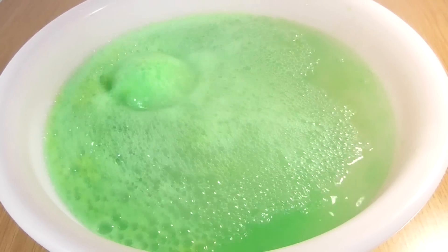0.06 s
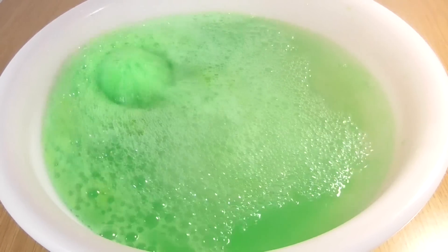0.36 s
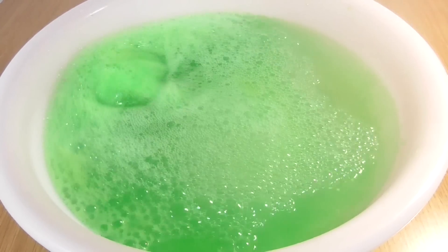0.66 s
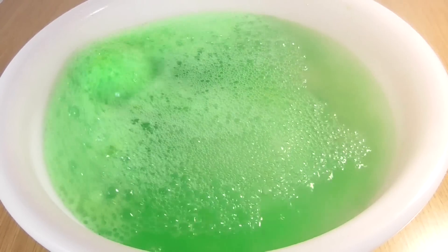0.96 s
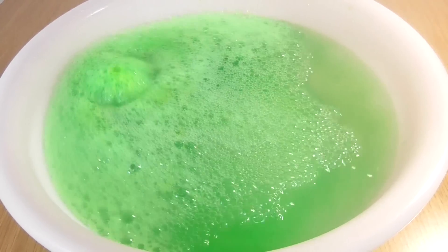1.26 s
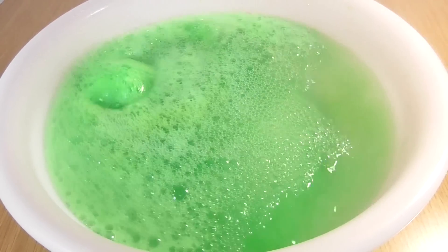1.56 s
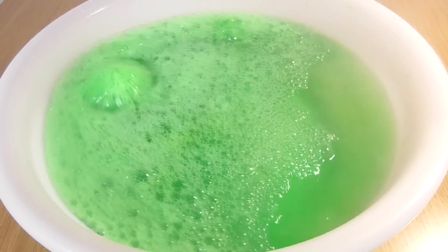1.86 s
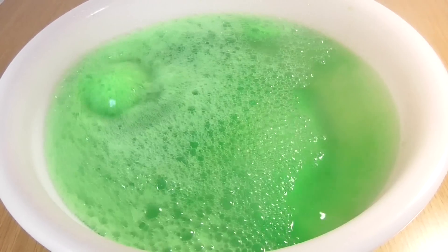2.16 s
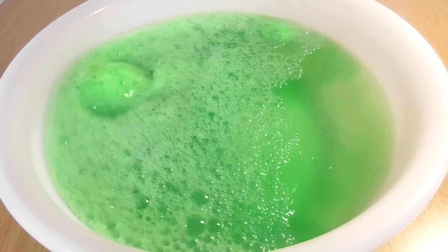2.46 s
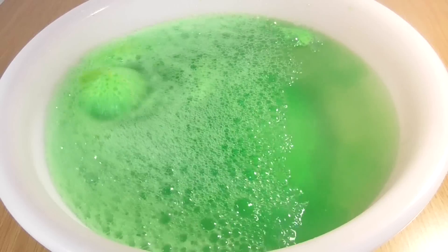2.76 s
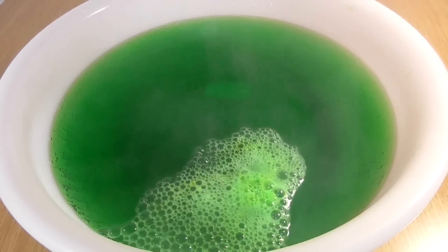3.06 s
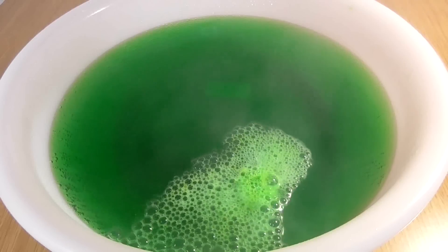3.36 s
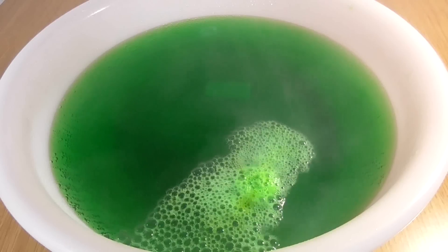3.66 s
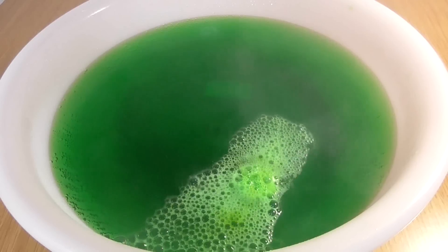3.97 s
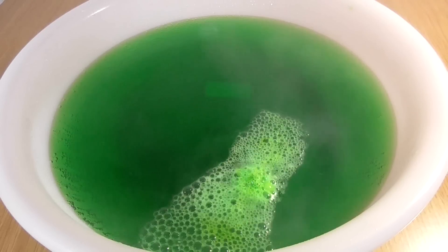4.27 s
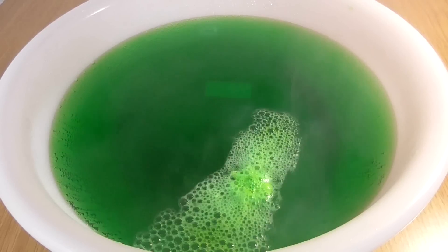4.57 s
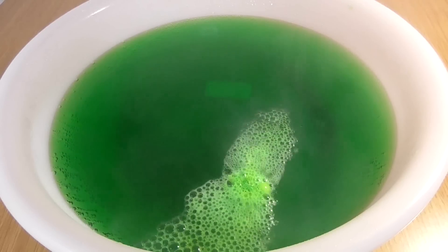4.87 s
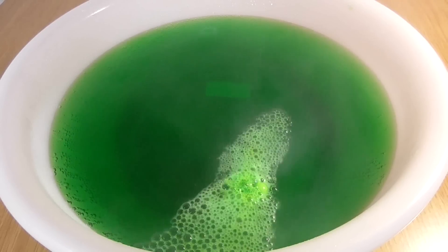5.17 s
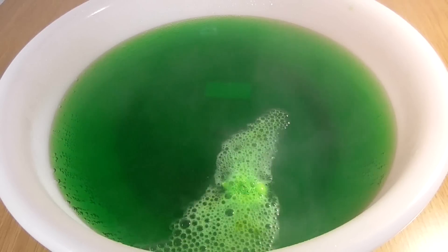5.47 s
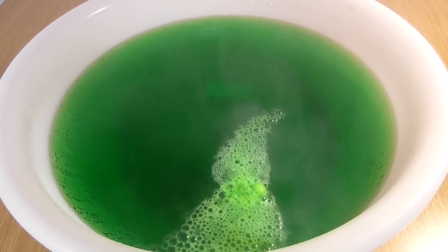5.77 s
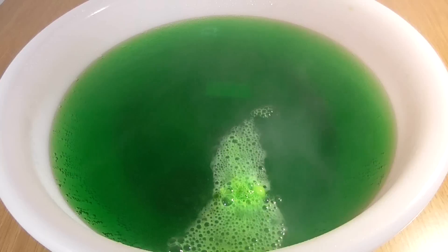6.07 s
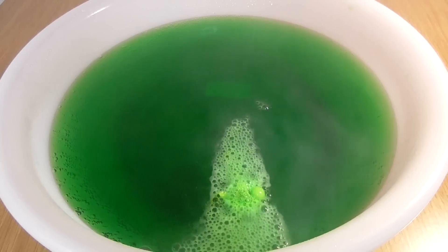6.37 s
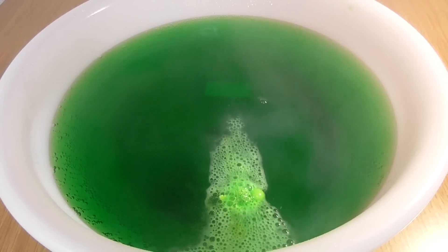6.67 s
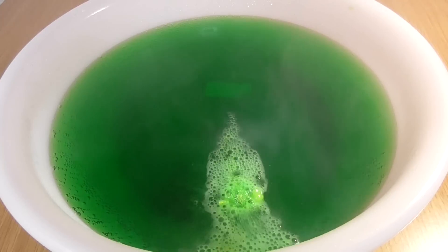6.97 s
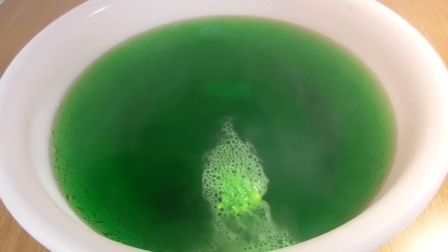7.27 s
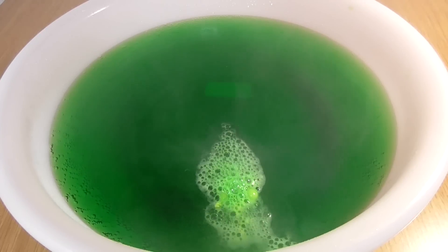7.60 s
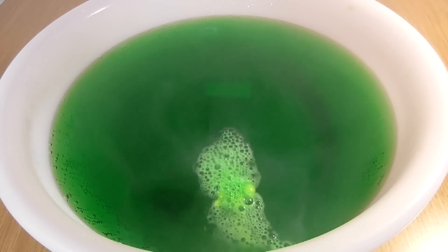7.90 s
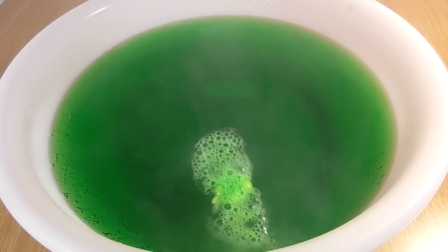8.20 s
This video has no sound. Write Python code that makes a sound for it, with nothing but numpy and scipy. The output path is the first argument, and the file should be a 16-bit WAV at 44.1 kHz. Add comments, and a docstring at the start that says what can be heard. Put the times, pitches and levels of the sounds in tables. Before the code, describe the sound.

Dense, crackling fizz of foam on water, with two soft knocks early on, suddenly giving way to a fine, high hiss of tiny bubbles.

```python
"""A full, bright fizz: a bath ball dissolves under a thick raft of foam in a bowl of water.
Thousands of tiny bubbles burst each second, each an impulse coloured by the resonances of the bowl.
The scene then jumps ahead to the last crumb of the ball, whose finer bubbles make a thin, high hiss.
Beneath lie the room's low noise, a few soft knocks early on, and later soft rustles and faint hums."""
import sys
import numpy as np
from scipy import signal
from scipy.fft import rfft, irfft
from scipy.io import wavfile

SR = 44100
rng = np.random.default_rng(int(sys.argv[2]) if len(sys.argv) > 2 else 0)


def store_pcm(level_fs):
    """Save levels as 16-bit WAV."""
    pcm = np.round(np.clip(level_fs, -1, 1) * 32767).astype(np.int16)
    wavfile.write(sys.argv[1], SR, np.atleast_2d(pcm).T)


N = 367794
T = np.arange(N) / SR
HZ = np.fft.rfftfreq(N, 1 / SR)
JUMP_S = 3.131  # the foam gives way to the last crumb


def gain_of(db):
    """The decibel scale: amplitude grows tenfold every 20 dB."""
    return 10 ** (np.asarray(db) / 20)


def unit_rms(pair):
    """Normalisation: the mean of the two channels is scaled to rms 1."""
    return pair / np.sqrt(np.mean(pair.mean(0) ** 2) + 1e-20)


def curve(table, column=1):
    """Interpolation in log frequency: one column of a table at every frequency."""
    columns = np.transpose(table)
    return np.interp(np.log(HZ + 1), np.log(columns[0] + 1), columns[column])


def wander(rate_hz):
    """Low-passed noise: a random fluctuation of rms 1, mostly slower than rate_hz."""
    slow = irfft(rfft(rng.standard_normal(N)) / (1 + (HZ / rate_hz) ** 4), N)
    return slow / slow.std()


def minimum_phase(db):
    """Causality: a frequency response with this gain that rings only after the impulse."""
    cepstrum = irfft(np.log(gain_of(db)), N)
    cepstrum[1:N // 2] *= 2
    cepstrum[N // 2 + 1:] = 0
    return np.exp(rfft(cepstrum))


def bursts(per_s, spread_db=2.0):
    """Shot noise: the spectrum of randomly timed clicks from many small bubbles and a few large ones."""
    size = gain_of(spread_db * np.minimum(rng.exponential(1, N), 6))
    polarity = rng.choice([-1, 1], N)
    bursting = rng.random(N) < per_s / SR
    clicks = size * polarity * bursting
    return rfft(clicks / clicks.std())


def reflections(t60):
    """Reverberation: the response of dense, exponentially dying echoes from bowl, table and walls."""
    echoes = rng.standard_normal(N) * gain_of(-60 * T / t60) * (T > 0.001)
    return rfft(echoes / np.linalg.norm(echoes))


# peaks and hollows of the air in the bowl: (frequency [Hz], width [Hz], gain [dB])
BOWL_RESONANCES = [(288, 44, 0.5), (408, 57, 2.5), (526, 130, 0.5), (630, 34, 3.5), (758, 86, 3.5),
                   (892, 170, -2), (1113, 160, 5.5), (1430, 300, 1.1), (1780, 340, -2.5), (2050, 160, 0.5),
                   (2724, 400, -3.5), (3130, 180, 1.5)]

def bowl_db():
    """Cavity resonance: the air in and around the bowl lifts some bands and weakens others."""
    return sum(db * np.exp(-2 * ((HZ - hz) / width) ** 2) for hz, width, db in BOWL_RESONANCES)


def fizz(level_db, coarse_db, spectrum, ports, balance, per_s, echo_db, t60, coarse_hz, spurt_db=0.3):
    """Source and filter: bursts ring in the bowl and reach two microphone ports by different paths."""
    shared, separate = bursts(per_s), bursts(per_s)
    coherence = np.clip(curve(ports), 0, 1)
    pair = np.array([shared, coherence * shared + np.sqrt(1 - coherence ** 2) * separate])
    pair *= 1 + gain_of(echo_db) * reflections(t60)
    # each port takes half of the level and phase difference
    lean = gain_of(curve(balance) / 2) * np.exp(0.5j * curve(ports, column=2))
    pair *= np.array([lean, 1 / lean])
    pair *= minimum_phase(curve(spectrum) + bowl_db())
    # large bubbles sound lower: they fill the coarse band
    coarse = irfft(pair / (1 + (HZ / coarse_hz) ** 8), N)
    fine = irfft(pair, N) - coarse
    # the gas leaves the ball in small, uneven spurts
    level_db = level_db + spurt_db * wander(rate_hz=30)
    coarse_db = coarse_db + spurt_db * wander(rate_hz=30)
    return gain_of(level_db) * unit_rms(fine + gain_of(coarse_db) * coarse)


# mean spectrum of a burst in the foam: (frequency [Hz], relative spectral level [dB])
FOAM_SPECTRUM = [(100, -33.5), (280, -19), (560, -20.5), (1400, -14), (2400, -13), (4200, -10.5),
                 (5000, -8), (6500, -5.5), (7600, 0), (9200, -1.5), (10800, -3), (12800, -9.5),
                 (14300, -16.5), (15700, -25)]
# likeness of the foam at the two ports: (frequency [Hz], coherence [0-1], left phase lead [rad])
FOAM_COHERENCE = [(300, 0.6, -0.074), (1200, 0.93, -0.27), (4000, 0.85, -0.13), (6300, 1, -0.5),
                  (8600, 0.54, -0.65), (9400, 0.62, -.8), (12000, 0.8, -0.19), (14000, 0.06, -.3)]
# level difference between the ports: (frequency [Hz], left minus right [dB])
FOAM_BALANCE = [(500, 0), (2400, 0.9), (4100, 1.2), (6300, -1), (8600, -0.5), (9400, 0.5), (11500, -2),
                (13700, -6.3), (15500, -.5)]

def foam(surge_db=2, surge_s=0.52, thinning_db_per_s=0.5):
    """Superposition of bursts of every size: a surge of gas dies away and the large bubbles thin out."""
    level_db = -35.5 + surge_db * np.exp(-(T / surge_s) ** 3)
    coarse_db = 1.1 - thinning_db_per_s * T
    return fizz(level_db, coarse_db, FOAM_SPECTRUM, FOAM_COHERENCE, FOAM_BALANCE,
                per_s=18000, echo_db=-16.5, t60=0.16, coarse_hz=3060)


# low noise of the room: (frequency [Hz], relative spectral level [dB])
ROOM_SPECTRUM = [(20, -27), (40, -16), (55, -7), (80, -6), (115, 2.5), (165, -1), (290, -1.5), (480, -8),
                 (1100, -12.5), (2000, -34), (5000, -45)]

def room(bass_coherence=0.45, coherent_below_hz=130, lean_db=0.55, rise_db_per_s=0.44):
    """A diffuse field: dull noise that is alike at the two ports only at long wavelengths."""
    shared, left, right = rng.standard_normal((3, N))
    coherence = bass_coherence / (1 + (HZ / coherent_below_hz) ** 2)
    pair = np.sqrt(coherence) * rfft(shared) + np.sqrt(1 - coherence) * rfft([left, right])
    noise = unit_rms(irfft(pair * gain_of(curve(ROOM_SPECTRUM) + bowl_db()), N))
    level_db = np.where(T < JUMP_S, -68.5, -69.5 + rise_db_per_s * (T - JUMP_S))
    return noise * gain_of(level_db) * gain_of([[-lean_db], [lean_db]])


# light bumps: (time [s], peak level [dB])
KNOCK_IMPACTS = [(0.947, -47), (0.954, -41.5), (1.309, -53), (1.324, -45)]
# modes a bump excites: (frequency [Hz], relative level [dB], 60 dB decay time [s])
KNOCK_RESONANCES = [(135, -13, .09), (266, 2, 0.044), (360, -4, 0.057), (513, -5, 0.061)]

def knocks(cutoff_hz=90):
    """Damped vibration: each bump rings a few low modes, heard as a soft knock with little deep bass."""
    t = T[:SR // 4]
    ring = sum(gain_of(db - 60 * t / t60) * np.sin(2 * np.pi * hz * t)
               for hz, db, t60 in KNOCK_RESONANCES)
    ring = signal.sosfilt(signal.butter(2, cutoff_hz, "highpass", fs=SR, output="sos"), ring)
    ring /= abs(ring).max()
    out = np.zeros(N)
    for start, db in KNOCK_IMPACTS:
        out[round(start * SR):][:len(t)] += gain_of(db) * ring
    return out


# hiss of the gas flowing from the crumb: (time [s], level [dB])
CRUMB_GAS_FLOW = [(3.15, -35), (3.7, -35.5), (4.45, -34.5), (5.75, -35.5), (6.03, -34.5), (6.18, -35),
                  (7.1, -34), (8.0, -35.5), (8.34, -34.5)]
# mean spectrum of a burst over the crumb: (frequency [Hz], relative spectral level [dB])
CRUMB_SPECTRUM = [(200, -41), (700, -28), (2400, -28), (3300, -23.5), (4300, -20), (4800, -16.5),
                  (5700, -15.5), (7400, -3), (8300, 0), (9500, -2), (10700, -2.6), (12000, -8),
                  (14500, -19), (15700, -25)]
# likeness of the hiss at the two ports: (frequency [Hz], coherence [0-1], left phase lead [rad])
CRUMB_COHERENCE = [(400, 0.075, 0), (1200, 0.53, 0.062), (2030, 1, -0.018), (6900, 0.98, 0.061),
                   (9900, 0.84, 0.48), (11100, 0.92, .1), (14000, 0.87, .1), (15500, .55, -.3)]
# level difference between the ports: (frequency [Hz], left minus right [dB])
CRUMB_BALANCE = [(4000, 0), (9300, -0.5), (10300, -4.5), (13300, -3), (15300, -7)]

def crumb(thinning_db_per_s=0.21):
    """Smaller bubbles sound higher: the last crumb's narrow stream grows finer as its flow rises."""
    flow_db = np.interp(T, *np.transpose(CRUMB_GAS_FLOW))
    excess_db = flow_db - flow_db[T > JUMP_S].mean()
    coarse_db = 0.37 - excess_db - thinning_db_per_s * (T - JUMP_S)
    return fizz(flow_db, coarse_db, CRUMB_SPECTRUM, CRUMB_COHERENCE, CRUMB_BALANCE,
                per_s=26000, echo_db=-16, t60=0.26, coarse_hz=5700)


# swells of rustling: (centre time [s], half length [s], level [dB])
RUSTLE_SWELLS = [(5.78, 0.037, -71), (7.39, .03, -66), (7.97, 0.32, -66.5)]
# dull colour of a rustle: (frequency [Hz], relative spectral level [dB])
RUSTLE_SPECTRUM = [(40, -20), (110, -1), (190, -8), (300, 1), (500, -7.5), (1000, -13), (2000, -28),
                   (5000, -50)]

def rustles(lump_db=3.0, lump_hz=14, stereo_spread=0.7):
    """Amplitude-modulated noise: something soft shifts nearby in dull, lumpy swells."""
    swell = sum(gain_of(db) * np.exp(-((T - centre) / half) ** 2) for centre, half, db in RUSTLE_SWELLS)
    pair = rng.standard_normal(N) + stereo_spread * rng.standard_normal((2, N))
    noise = unit_rms(irfft(rfft(pair) * gain_of(curve(RUSTLE_SPECTRUM)), N))
    return noise * swell * gain_of(lump_db * wander(lump_hz))


# faint low tones: (start [s], end [s], frequency [Hz], level [dB])
HUM_TONES = [(5.9, 6.85, 49, -82), (6.2, 6.98, 199.7, -74)]

def hums(waver_depth=0.2, waver_hz=6):
    """Amplitude-modulated pure tones: each hum swells, wavers and fades."""
    out = np.zeros(N)
    for start, end, hz, db in HUM_TONES:
        from_centre = np.clip(2 * (T - start) / (end - start) - 1, -1, 1)
        swell = 1 - from_centre ** 4
        waver = 1 + waver_depth * wander(waver_hz)
        tone = np.sqrt(2) * np.sin(2 * np.pi * hz * T)
        out += gain_of(db) * swell * waver * tone
    return out


def scene():
    """Linear superposition: the foam, then at once the last crumb, adds to the room's quiet sounds."""
    fizzing = np.where(T < JUMP_S, foam(), crumb())
    return fizzing + room() + knocks() + rustles() + hums()


def record(dry):
    """Band limiting: a steep, linear-phase low-pass removes the highest treble."""
    cutoff_hz = 15800
    low_pass = signal.firwin(511, cutoff_hz, window=("kaiser", 9), fs=SR)
    return signal.oaconvolve(dry, low_pass[None], "same", axes=1)


dry = scene()
out = record(dry)
store_pcm(out)
```